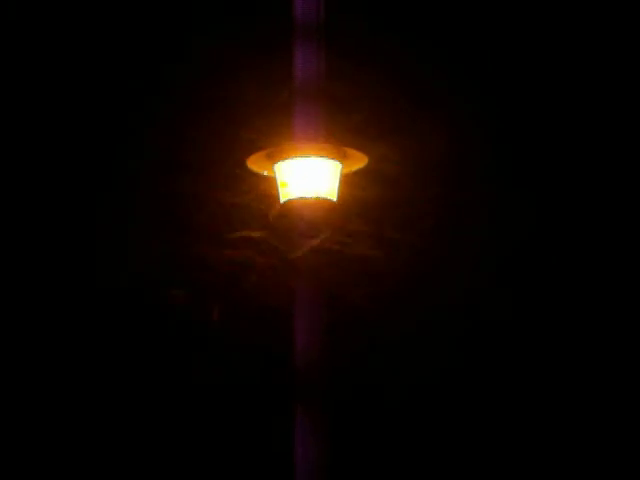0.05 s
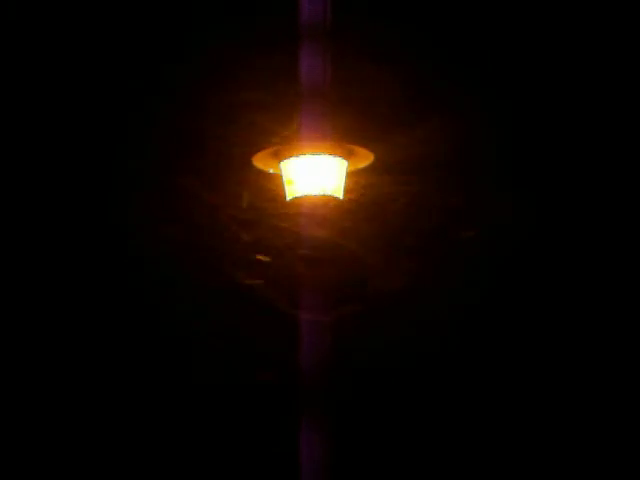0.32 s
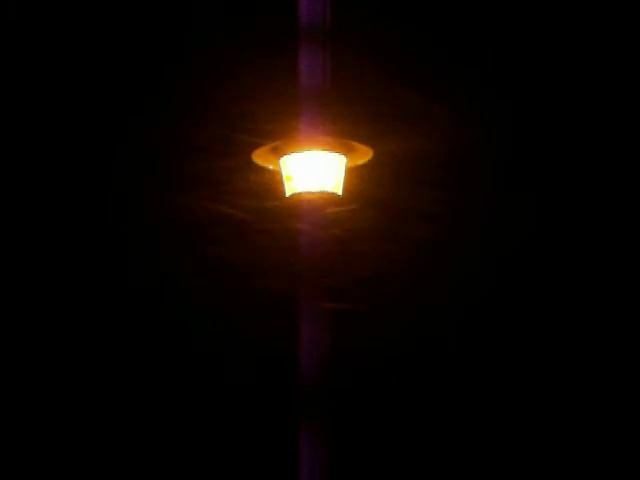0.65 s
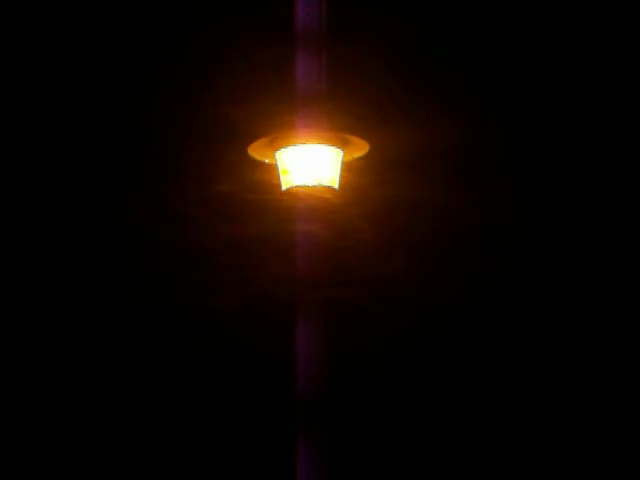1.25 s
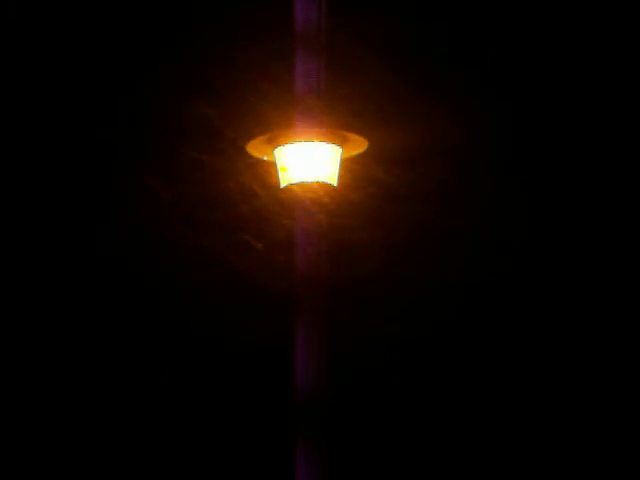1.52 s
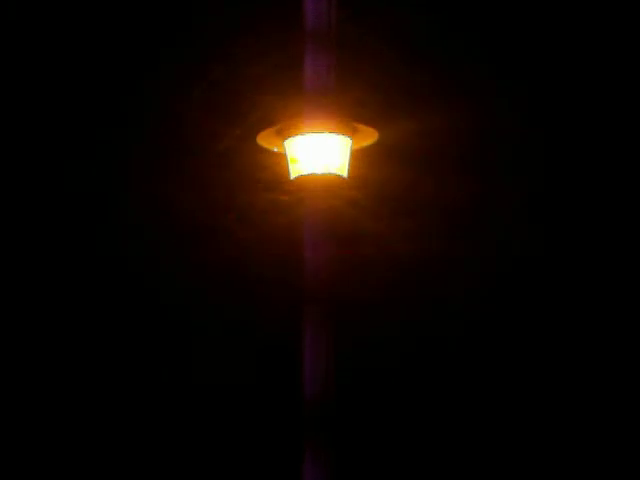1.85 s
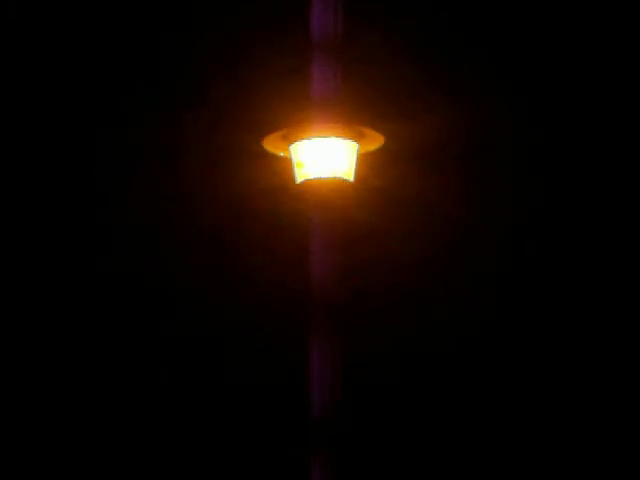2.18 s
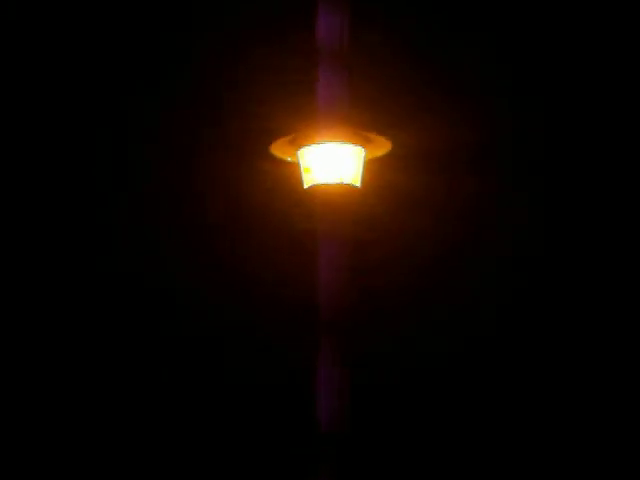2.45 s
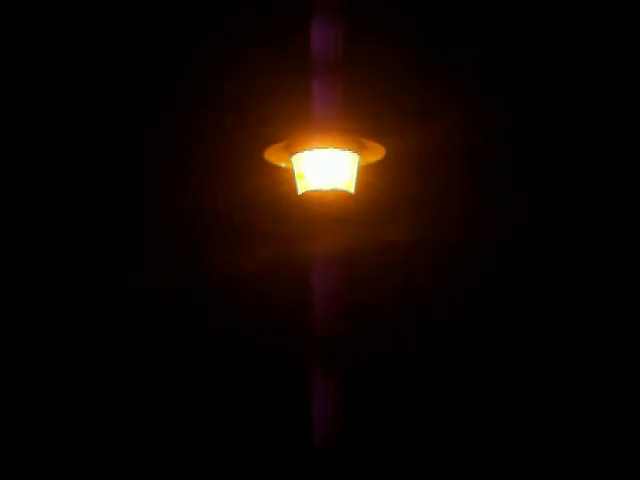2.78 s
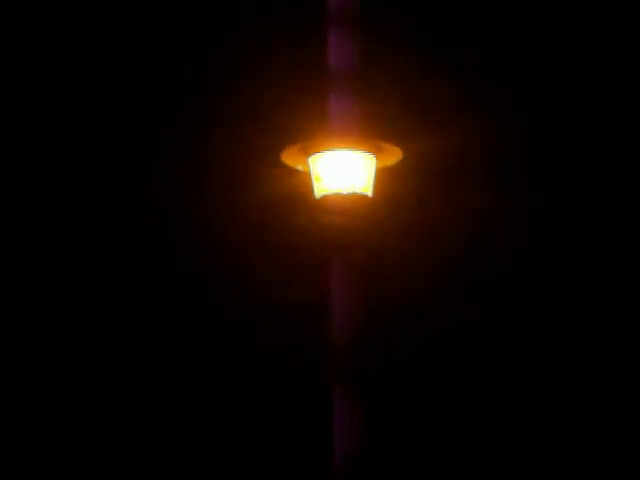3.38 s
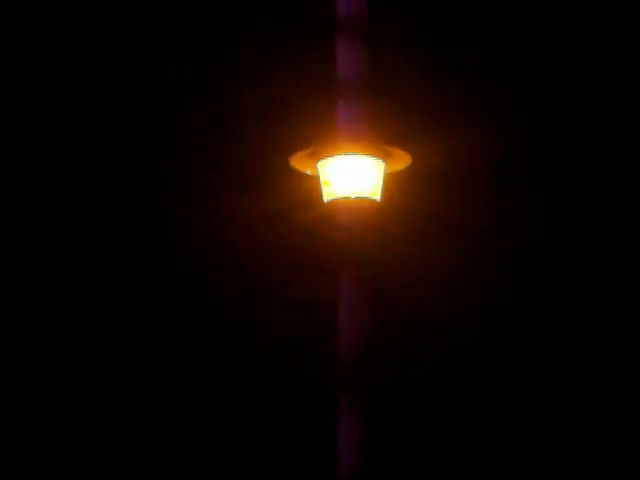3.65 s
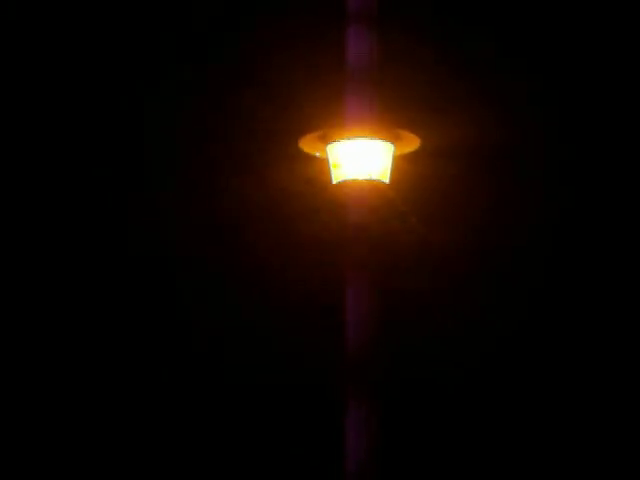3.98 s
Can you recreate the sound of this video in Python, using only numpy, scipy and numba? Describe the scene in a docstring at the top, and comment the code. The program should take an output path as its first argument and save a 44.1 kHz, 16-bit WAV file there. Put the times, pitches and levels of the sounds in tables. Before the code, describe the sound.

Gusty wind hitting a microphone outdoors at night, with thumps and clicks after a quiet hiss.

```python
"""An even hiss and a soft rumble: night air outdoors, on a small camera microphone.
After one soft puff the wind rises and buffets the microphone port itself. Its eddies get louder and
brighter with speed, deep pressure swings set in, and the gain control ducks the hiss under the eddies.
Sudden buffets thump; the hardest overload the recorder, whose signal flips over with a sharp click."""
import sys
import numpy as np
from scipy import signal
from scipy.fft import rfft, irfft
from scipy.io import wavfile
from scipy.ndimage import uniform_filter1d
from numba import njit

SR = 44100
rng = np.random.default_rng(int(sys.argv[2]) if len(sys.argv) > 2 else 0)


def wrap_up_sound(samples):
    """Save the sound to the file named by the first command line argument, as 16-bit audio."""
    columns = np.atleast_2d(samples).T
    # keep every value between -1 and 1, then stretch to whole-number steps
    tamed = np.clip(columns, -1, 1)
    steps = np.round(tamed * 32767).astype(np.int16)
    wavfile.write(sys.argv[1], SR, steps)


N = 176400
REFERENCE_M_S = 6  # wind speed at which the eddy and chop settings hold

# Wind right at the microphone: t/s, speed/(m/s)
WIND_SPEEDS = [(0, 2.05), (1.28, 2.13), (1.44, 3.08), (1.52, 3.3), (1.59, 6.6), (1.65, 6.24), (1.71, 4.8),
               (1.77, 7.23), (1.86, 6.8), (1.92, 4.9), (1.958, 9), (2.0, 4.5), (2.11, 8.2), (2.16, 6.9),
               (2.21, 3.5), (2.28, 7.36), (2.38, 5.84), (2.44, 4.75), (2.49, 3.9), (2.53, 3.8), (2.58, 5.8),
               (2.66, 4.2), (2.72, 5.95), (2.78, 4.6), (2.85, 6.3), (2.92, 6.1), (2.99, 6), (3.035, 12),
               (3.06, 7.6), (3.1, 6.4), (3.17, 6.65), (3.22, 5.8), (3.33, 5.06), (3.42, 6.2), (3.49, 10.8),
               (3.57, 6.7), (3.62, 6), (3.66, 3.9), (3.72, 3.1), (3.77, 5.5), (3.82, 3.2), (3.87, 5.25),
               (3.94, 5.2), (4, 4.6)]
def wind_speed(t):
    """A light breeze that rises into gusts, in m/s."""
    return np.interp(t, *np.array(WIND_SPEEDS).T)


# Turbulence on the port, ahead of its moving low-pass: f/Hz, relative level/dB
EDDY_SPECTRUM = [(40, -1), (140, 0), (400, -4.5), (1100, -9), (2200, -15), (5000, -23.5)]
def eddies(speed):
    """Eddies strike the port amid smoother turbulence: faster air makes them denser, louder, sharper."""
    strikes_per_s, corner_hz, level_db = 210, 396, -7
    pace = speed / REFERENCE_M_S
    hits = rng.random(N) < strikes_per_s * pace / SR
    strikes = hits * rng.standard_normal(N) / np.sqrt(pace)
    turbulence = shape(unit(strikes) + .3 * rng.standard_normal(N), EDDY_SPECTRUM)
    flutter = walk(rate=90)  # brightness and level flicker together
    corner = np.clip(corner_hz * pace ** 2.46 * 2 ** (.35 * flutter), 20, SR / 10)
    gain = undb(level_db + 1.5 * flutter) * pace ** 1.24
    return gain * unit(lowpass(turbulence, corner, damping=1.31))


# Sudden buffets on the port: t/s, relative level/dB, half width/ms
PRESSURE_DIPS = [(1.585, -3, 0.76), (1.591, -7, 0.25), (1.626, 1.5, 0.99), (1.642, 4.5, 0.9),
                 (1.746, 1, 0.5), (1.771, -10, 1), (1.847, 1, 0.17), (1.881, 2, 0.39), (1.956, 7.5, 0.17),
                 (1.984, -14.5, 0.17), (2.267, -28, 0.8), (2.281, 4, 0.29), (2.298, -1, 0.2),
                 (2.342, -8, 0.38), (2.377, -9, 0.79), (2.463, -1.5, 0.45), (2.626, 2, 0.5),
                 (2.66, 3, 0.17), (2.855, -1.5, 0.31), (3.033, -11, 0.17), (3.079, -7.5, 0.38),
                 (3.171, -24, 0.5), (3.218, -6, 0.39), (3.361, -2.5, 0.46), (3.409, -7, 0.63),
                 (3.465, -4, 0.17), (3.477, -20.5, 0.41), (3.52, -1.5, 0.17), (3.766, -5.5, 0.63),
                 (3.845, 11, 0.28), (3.869, -21, 0.5), (3.924, -13.5, 0.32)]
def buffets(t):
    """Brief rounded dips of pressure thump, too quick for the gain control."""
    boost_db, lag_s = 2, .00088
    pressure = np.zeros(N)
    for at, db, half_width_ms in PRESSURE_DIPS:
        widths = (t - at - lag_s) * 1000 / half_width_ms
        pressure -= undb(db + boost_db) / (1 + widths ** 2) ** 1.05
    return pressure


# Overload clicks in the recorder: t/s, flip length/ms, gaps to further flips/ms
OVERLOADS = [ (1.5721, .09, [.2, .2]), (1.8243, .1, [.55]), (2.0384, .17, []), (2.1887, .1, []),
             (2.2466, .1, [.42, .22]), (2.4014, .1, [.55, .2]), (2.6905, .1, []), (2.7897, .1, []),
             (2.8002, .1, [.2]), (2.9232, .12, [.3, .21]), (3.0139, .09, [.19]), (3.9572, .11, [.45])]
def overload(x, t):
    """Each listed spike reaches full scale, where the signal flips to the opposite limit 1-3 times."""
    full_scale, spike_ms, sample_ms = .8, .57, 1000 / SR
    for at, flip_ms, gaps in OVERLOADS:
        ms = (t - at) * 1000
        centres = np.cumsum([0, *gaps])
        outside_ms = ms - np.clip(ms, 0, centres[-1])  # the spike holds from first flip to last
        spike = 1 / (1 + (outside_ms / spike_ms) ** 2) ** 2
        flipped = sum(np.clip((flip_ms / 2 - np.abs(ms - c)) / sample_ms + .5, 0, 1) for c in centres)
        x = x * (1 - spike) + full_scale * (spike - 2 * flipped)
    return x


# Slow pressure swings at the microphone: f/Hz, relative level/dB
SURGE_SPECTRUM = [(14, -3.5), (25, 10.5), (55, 9), (100, 2.5), (170, -9), (400, -44)]
def surge(speed):
    """Deep pressure swings that set in with the wind and then hold their level."""
    onset = np.interp(speed, [1.8, 2.67], [0, 1])
    return undb(-18.5) * onset * noise(SURGE_SPECTRUM)


def puff(t, at_s=.102, width_s=.0027):
    """One soft push and pull of air on the port."""
    widths = (t - at_s) / width_s
    return -undb(-5.5) * widths / (1 + widths ** 2)


# Hiss and rumble of the open air all around the microphone: f/Hz, relative level/dB
HISS_SPECTRUM = [(120, -0.5), (170, 5.5), (260, 2), (420, -1), (620, 2), (780, 4), (950, 0.5), (1150, -5.5),
                 (1800, -10), (3100, -14), (4000, -12), (5200, -16)]
RUMBLE_SPECTRUM = [(12, -25.5), (24, -4.5), (42, -1), (55, -15), (85, -16), (130, -18.5), (300, -39.5)]
def night_air(speed):
    """Even hiss with a broad hump, over a low rumble; strong wind chokes the microphone and chops it."""
    chop = 2.2 * (speed / REFERENCE_M_S) ** 2 * walk(rate=130)
    air = undb(-26.5) * (noise(HISS_SPECTRUM) + noise(RUMBLE_SPECTRUM))
    return air / np.hypot(1, chop)


def gain_control(x, limit=.27):
    """The recorder turns its input down while the envelope is over the limit."""
    return x / np.maximum(follow(x, attack_s=.0024, release_s=.036) / limit, 1)


@njit
def follow(x, attack_s, release_s):
    """Envelope that rises fast and falls slowly."""
    y, envelope = np.empty(len(x)), 0.
    for i in range(len(x)):
        size = abs(x[i])
        envelope += (size - envelope) / (SR * (attack_s if size > envelope else release_s))
        y[i] = envelope
    return y


@njit
def lowpass(x, hz, damping):
    """Two-pole low-pass with a moving corner."""
    y, band_state, low_state = np.empty(len(x)), 0., 0.
    for i in range(len(x)):
        g = np.tan(np.pi * hz[i] / SR)
        band = (band_state + g * (x[i] - low_state)) / (1 + g * (g + damping))
        y[i] = low_state + g * band
        band_state, low_state = 2 * band - band_state, 2 * y[i] - low_state
    return y


def undb(db):
    """Decibels to gain."""
    return 10 ** (np.asarray(db) / 20)


def unit(x):
    """Scale to rms 1."""
    return x / np.sqrt(np.mean(x ** 2))


def shape(x, points):
    """Filter x by a curve of (f/Hz, level/dB) points, falling away below the first; rms 1."""
    hz, db = np.array(points, float).T
    f = np.maximum(np.arange(N // 2 + 1) * SR / N, 1)
    gain = undb(np.interp(np.log(f), np.log(hz), db)) * np.minimum(f / hz[0], 1) ** 2
    return unit(irfft(rfft(x) * gain, N))


def noise(points):
    """Noise with a spectrum of (f/Hz, level/dB) points."""
    return shape(rng.standard_normal(N), points)


def walk(rate):
    """Random levels held 1 / rate s and smoothed twice; rms 1."""
    hold = max(int(SR / rate), 2)
    steps = rng.standard_normal(N)[np.arange(N) // hold]
    return unit(uniform_filter1d(uniform_filter1d(steps, hold), hold))


def flatten(x, limit, hardness):
    """Round off peaks at the limit."""
    return x / (1 + np.abs(x / limit) ** hardness) ** (1 / hardness)


def scene():
    """Air and eddies through the gain control, with surges, puff, buffets and overload clicks on top."""
    t = np.arange(N) / SR
    speed = wind_speed(t)
    ducked = gain_control(night_air(speed) + eddies(speed))
    pressure = ducked + surge(speed) + puff(t) + buffets(t)
    return overload(flatten(pressure, limit=.72, hardness=2.87), t)[None]


def record(dry):
    """A narrow-band mono recorder whose output stage flattens the highest peaks."""
    band_hz, top_hz = 5750, 16500
    narrow = signal.sosfiltfilt(signal.butter(18, band_hz, fs=SR, output="sos"), dry)
    clipped = flatten(narrow, limit=.67, hardness=27)
    return signal.sosfilt(signal.ellip(8, .2, 70, top_hz, fs=SR, output="sos"), clipped)


dry = scene()
out = record(dry)
wrap_up_sound(out)
```